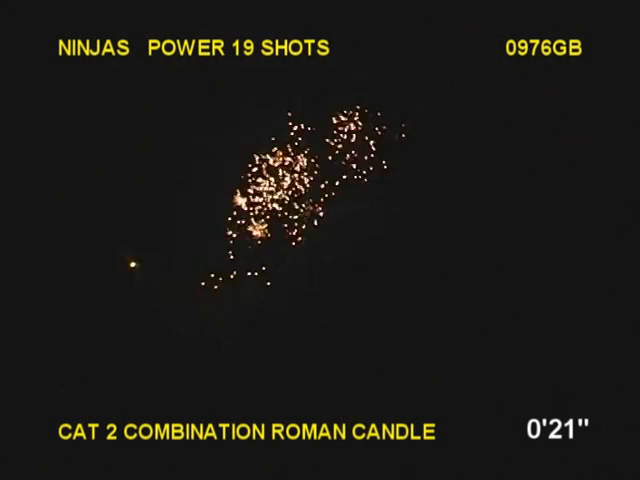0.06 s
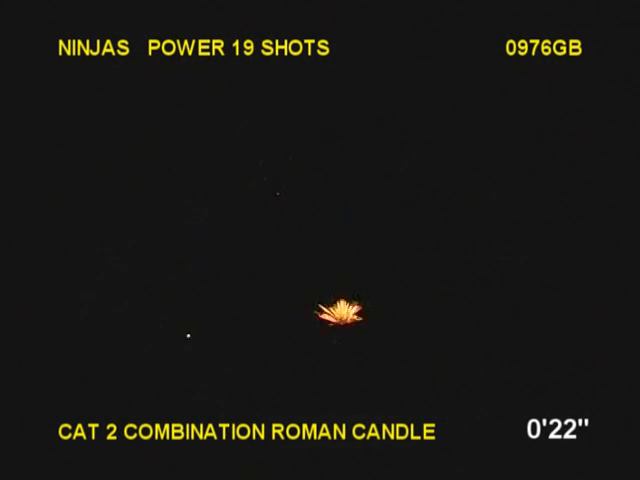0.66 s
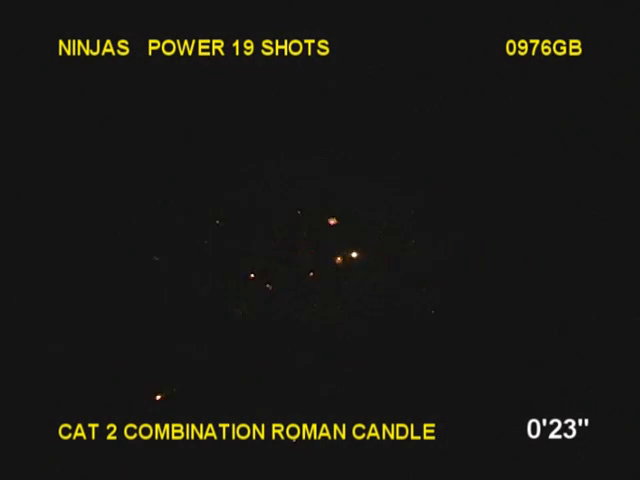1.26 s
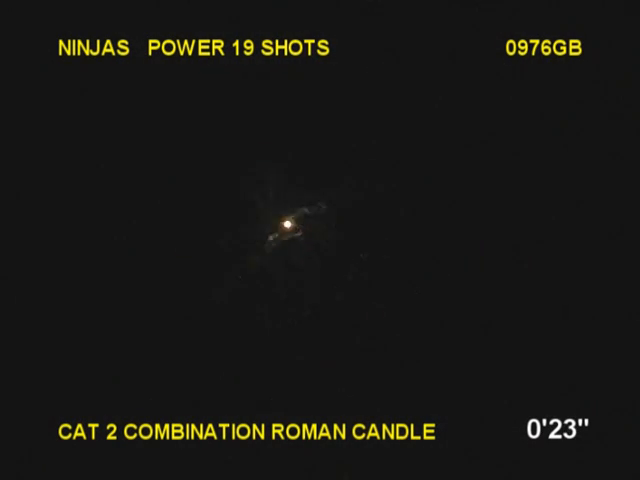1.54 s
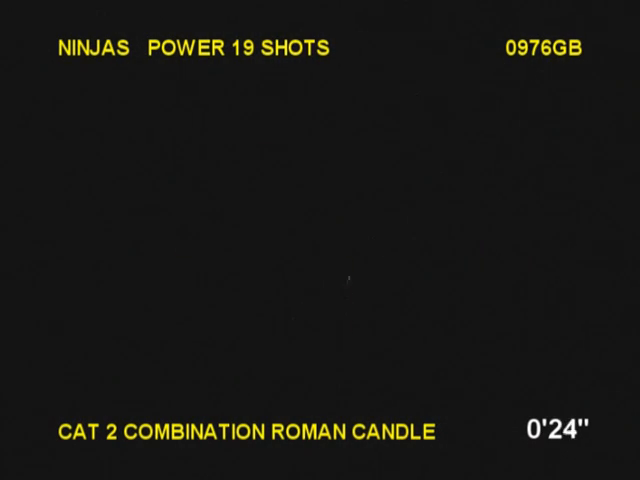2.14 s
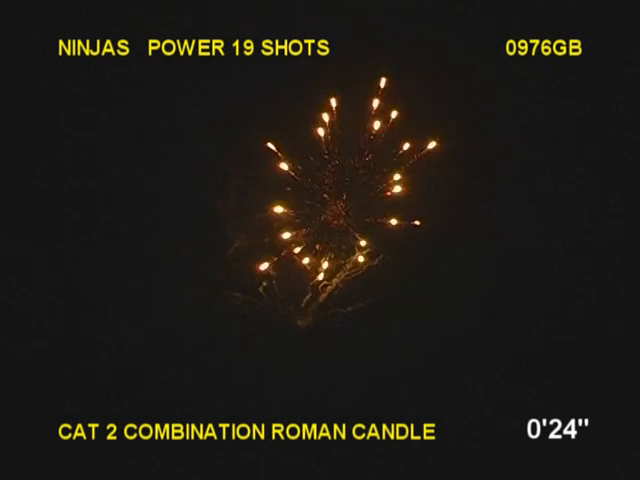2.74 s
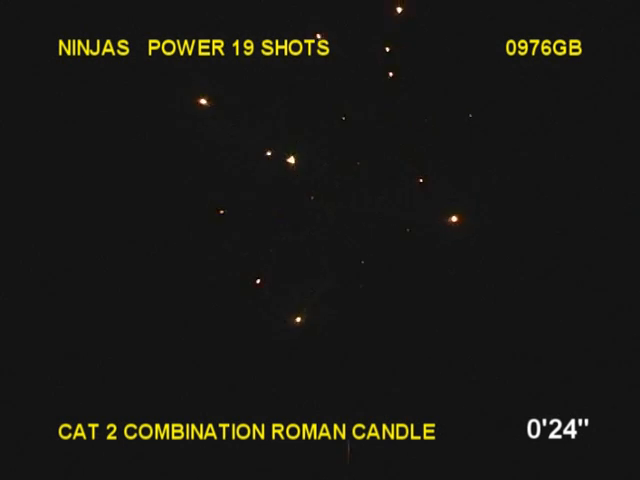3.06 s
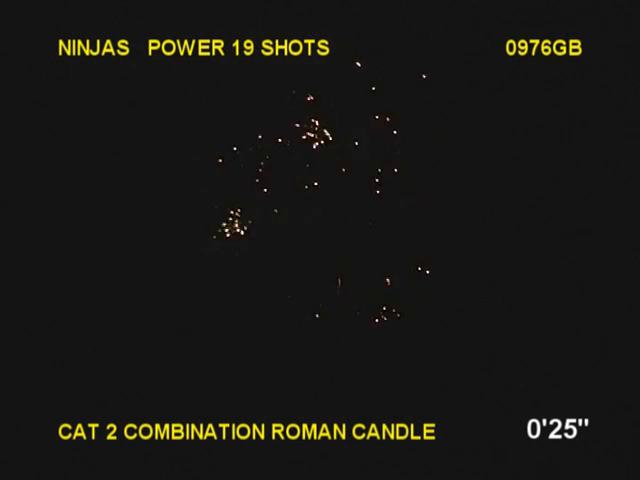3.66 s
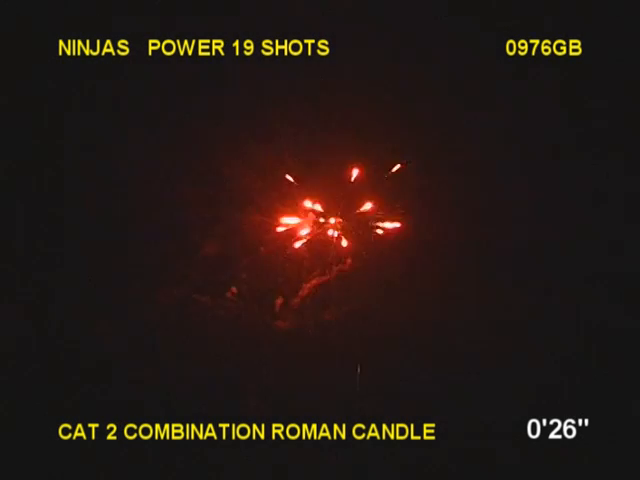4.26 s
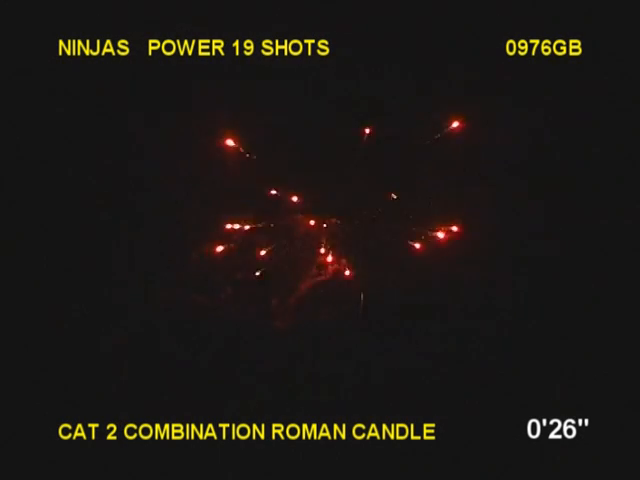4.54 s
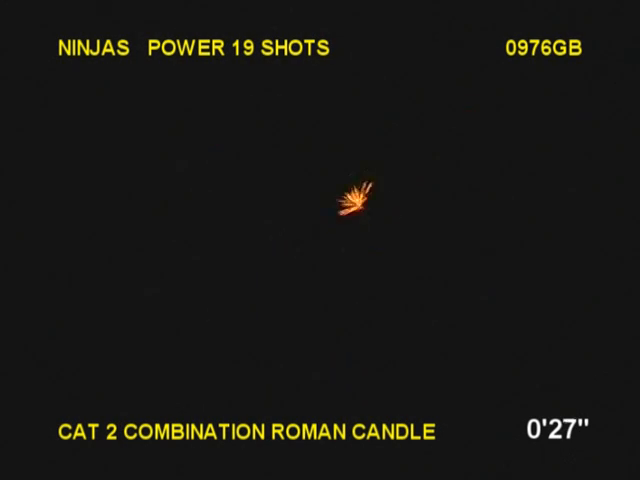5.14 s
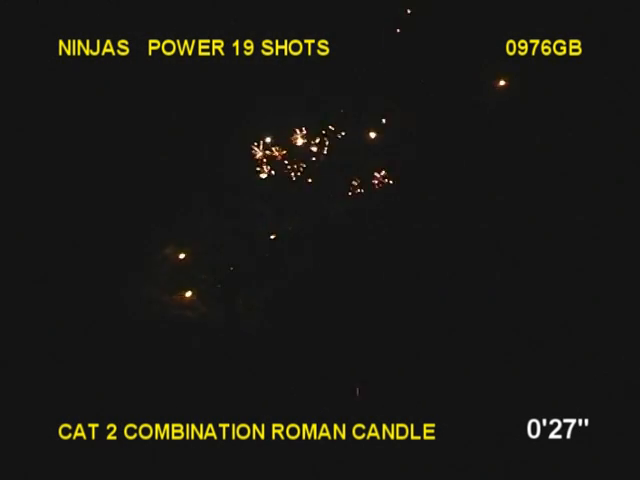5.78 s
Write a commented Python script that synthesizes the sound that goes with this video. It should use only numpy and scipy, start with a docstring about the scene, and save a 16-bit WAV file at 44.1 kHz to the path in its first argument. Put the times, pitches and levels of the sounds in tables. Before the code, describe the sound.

An outdoor firework barrage repeats low launch thumps, sharp echoing shell bursts and short clouds of crackle.

```python
"""A roman candle barrage outdoors at night, opening on the roll of shots just fired and a cloud of crackle.
Shells burst overhead at 1.0, 2.8 and 4.4 s; about 0.75 s after each, its stars crackle in tiny shocks.
In between, lift charges thump from the tubes. Debris taps down near 4.2 s; a last shell bursts at 5.5 s.
Each shot reaches the near microphone (left) some 85 ms before the far one (right). Buildings and trees
answer with echoes and a long roll; the bursts overload the recorder and ring hollow in its hum filter."""
import sys
import numpy as np
from scipy import signal
from scipy.fft import rfft, irfft, next_fast_len
from scipy.io import wavfile

SR = 44100
rng = np.random.default_rng(int(sys.argv[2]) if len(sys.argv) > 2 else 0)


def log_audio(samples):
    """Write samples as a 16-bit WAV file to the path given in sys.argv[1]."""
    # one column per channel
    frames = np.atleast_2d(samples).T
    # limit to full scale, then quantise
    limited = np.clip(frames, -1, 1)
    pcm = np.round(limited * 32767).astype(np.int16)
    wavfile.write(sys.argv[1], SR, pcm)


N = 265041
LEAD = SR  # samples before t = 0, for shots still rolling at the start
NEAR, FAR = 0, 1


# burst spectrum: f/Hz, level/dB
BURST_SPECTRUM = [(30, -45.5), (70, -15), (140, -4), (220, 2.5), (320, 3.5), (480, 3), (800, 1.5),
                  (1200, -3.5), (1800, -7), (3200, -12.5), (6400, -15.5), (11000, -25.5), (13500, -28.5),
                  (16000, -67)]
# shells: t/s, level/dB, lag to far mic/s, near ground bounce/s, far ground bounce/s
BURSTS = [(-.5, 6.5, 0.081, .00045, .0025), (0.9567, 6.5, .084, 0.00038, 0.00216),
          (2.8333, 7, 0.082, .00045, 0.00278), (4.4415, 6.5, .0819, .00046, .00275),
          (5.46, 6.5, 0.081, 0.00047, 0.0028)]

def bursts(near_db=4.5, far_db=11.5):
    """Each shell bursts with one shock wave; the near microphone stands low, the far one high."""
    out, pulse = np.zeros((2, LEAD + N)), shock(BURST_SPECTRUM)
    for t, db, lag_s, near_bounce_s, far_bounce_s in BURSTS:
        response = echoes(NEAR, roll_db=-3.5, wall_db=-7.5, air_db=3, grass_db=3.5, smear_db=2.5)
        near = with_echoes(bounced(pulse, near_bounce_s, share=0.67), pulse, response)
        response = echoes(FAR, roll_db=-8.5, wall_db=-13.5, air_db=2.5, grass_db=-0.5,
                          smear_s=0.0074, smear_db=3, lump_db=2.5)
        far = with_echoes(bounced(pulse, far_bounce_s, share=0.71), pulse, response)
        add(out[NEAR], t, amp(db + near_db) * lowpass(near, hz=11200, order=2))
        add(out[FAR], t + lag_s, amp(db + far_db) * far)
    return out


# lift charge spectrum: f/Hz, level/dB
LAUNCH_SPECTRUM = [(30, -53), (70, -4), (140, 1), (205, 3.5), (290, -3), (400, -4.5), (800, -23.5),
                   (1600, -23), (5000, -28.5), (11000, -42), (15000, -66)]
# lift charges: t/s, level/dB
LAUNCHES = [(-.38, -17.5), (1.5167, -17), (2.8989, -17.5), (3.9184, -16.5), (5.367, -21)]

def launches(lag_s=0.0887, near_db=3.5, far_db=8):
    """Lift charges thump from tubes at ground level; grass dulls the path to the low microphone."""
    out, pulse = np.zeros((2, LEAD + N)), shock(LAUNCH_SPECTRUM)
    for t, db in LAUNCHES:
        response = echoes(NEAR, roll_db=5.5, wall_db=4, air_db=-1.5)
        near = with_echoes(pulse, pulse, response)
        response = echoes(FAR, roll_db=-0.5, wall_db=7.5, air_db=-1, smear_db=-7,
                          sooner_s=0.00221, ground_db_per_s=50)
        far = with_echoes(pulse, pulse, response)
        add(out[NEAR], t, amp(db + near_db) * lowpass(near, hz=1920))
        add(out[FAR], t + lag_s, amp(db + far_db) * far)
    return out


# star pop spectrum: f/Hz, level/dB
STAR_SPECTRUM = [(60, -17.5), (250, 1.5), (700, 0.5), (1800, 1.4), (2700, -4.5), (3400, 0.5), (4200, -3),
                 (6000, -3.5), (9000, -14), (11500, -25.5), (13500, -29), (16000, -42)]
# star clouds: densest t/s, build-up/s, thinning/s, level/dB
STAR_CLOUDS = [(.265, 0.078, 0.14, -25), (1.69, .11, 0.14, -22), (3.59, .11, .22, -23.5),
               (5.168, .12, .11, -16.5)]
# single stars in and around the clouds: t/s, level/dB
LONE_STARS = [(0.0941, -27), (0.1394, -23), (0.163, -28), (0.1656, -15.5), (0.1763, -15), (0.1974, -19),
              (0.2237, -24), (0.2292, -18), (0.2374, -20), (0.2461, -15.5), (0.2547, -19), (0.2619, -13),
              (0.2689, -17), (0.2727, -13.5), (0.2839, -24), (0.289, -16.5), (0.2937, -20), (0.3015, -20),
              (0.311, -23), (0.3301, -16.5), (0.3405, -19), (0.347, -30), (0.3707, -19), (0.3745, -21),
              (0.378, -22.5), (0.3984, -16), (0.425, -19), (0.4449, -18.5), (0.7314, -24), (1.4661, -25),
              (1.4802, -18.5), (1.5124, -14), (1.5396, -16), (1.5613, -12), (1.5671, -20), (1.5852, -13.5),
              (1.6314, -12.5), (1.6498, -14), (1.656, -8), (1.6642, -10.5), (1.6719, -12), (1.6763, -9),
              (1.6865, -18), (1.7009, -19), (1.7045, -6.5), (1.7125, -10), (1.7381, -7), (1.759, -9),
              (1.789, -15), (1.7921, -24), (1.7952, -8.5), (1.8021, -21), (1.8194, -15), (1.8275, -12),
              (1.8368, -23), (1.9067, -12.5), (3.4102, -24.5), (3.4537, -21.5), (3.4824, -17),
              (3.5524, -13), (3.5635, -27), (3.5841, -26), (3.5963, -20), (3.6007, -14), (3.6095, -28),
              (3.6144, -13.5), (3.6557, -13.5), (3.6895, -15.5), (3.7115, -34), (3.72, -18), (3.773, -21),
              (3.778, -17), (3.7841, -31), (3.8247, -21), (3.8486, -24.5), (3.958, -15.5), (4.034, -19),
              (4.9644, -17.5), (4.976, -19), (5.0056, -15.5), (5.0239, -20), (5.0303, -15.5), (5.0509, -16),
              (5.0693, -16), (5.0945, -12.5), (5.097, -7.5), (5.1362, -6), (5.1471, -24), (5.1709, -23),
              (5.1761, -12.2), (5.1944, -11.5), (5.1997, -14.5), (5.2049, -24), (5.2147, -9.5),
              (5.2229, -14), (5.2434, -18), (5.2623, -20), (5.2856, -13), (5.289, -21), (5.3286, -13.5),
              (5.9923, -26)]

def crackle(far_db=0.5, scatter_db=-30, scatter_s=0.0077, lag_s=0.0825, lag_spread_s=0.0005):
    """Every star pops with a tiny shock of its own length, scattered by grass and nearby things."""
    pulse = shock(STAR_SPECTRUM, size=1024)
    cloud, near, far = np.zeros((3, LEAD + N))
    stars = np.vstack([cloud_stars(*row) for row in STAR_CLOUDS] + [LONE_STARS])
    n = np.arange(len(pulse))
    for t, db in stars:
        shortness, place, height, beam = rng.standard_normal(4)
        pop = amp(db) * np.interp(n * np.exp(0.11 * shortness), n, pulse)
        add(cloud, t, pop)
        scatter = amp(scatter_db) * rng.standard_normal(len(n)) * np.exp(-n / SR / scatter_s)
        pop = pop + np.convolve(pop, scatter)[:len(n)]
        # position in the sky sets the ground bounce and the lag between microphones
        steepness = np.exp(0.088 * height)
        add(near, t, bounced(pop, lag_s=0.000452 * steepness, share=0.61))
        far_pop = amp(2.4 * beam) * bounced(pop, lag_s=0.0029 * steepness, share=0.79)
        add(far, t + lag_spread_s * place, far_pop)
    near = with_echoes(near, cloud, echoes(NEAR, roll_db=-4.5, wall_db=-19, air_db=1, grass_db=1.5))
    far = with_echoes(far, cloud, echoes(FAR, roll_db=1.5, wall_db=-10, grass_db=-1.1))
    far = np.pad(far, (round(lag_s * SR), 0))
    return np.array([lowpass(near[:LEAD + N], hz=12000, order=6),
                     amp(far_db) * lowpass(far[:LEAD + N], hz=12200, order=6)])


def cloud_stars(middle_s, rise_s, fall_s, db, count=36, edge_db=1, spread_db=3):
    """Stars go off ever faster towards the cloud's middle, then thin out. Rows: t/s, level/dB."""
    burnt = 2 * (np.arange(count) + rng.random(count)) / count - 1
    edge = 1 - np.sqrt(1 - np.abs(burnt))
    times_s = middle_s + edge * np.where(burnt < 0, -rise_s, fall_s)
    levels_db = db + edge_db * edge + spread_db * rng.standard_normal(count)
    return np.column_stack([times_s, levels_db])


# tap spectrum: f/Hz, level/dB
TAP_SPECTRUM = [(100, -3), (400, 4.5), (1500, -1), (2700, -4), (3500, -2.5), (4300, -11), (7000, -15.5),
                (15000, -49)]
# debris landings: t/s, level/dB
TAPS = [(4.166, -27), (4.255, -24.5), (4.294, -28.5), (4.306, -28.5)]

def debris(decay_s=0.0011, near_db=-11):
    """Bits of casing tap down close to the far microphone; the surroundings scatter each tap."""
    track, age_s = np.zeros(LEAD + N), np.arange(SR // 20) / SR
    body = shock(TAP_SPECTRUM, size=1024)
    for t, db in TAPS:
        contact = rng.standard_normal(len(age_s)) * np.exp(-age_s / decay_s)
        tap = np.convolve(contact, body)
        add(track, t, amp(db) * tap / np.abs(tap).max())
    near, far = [with_echoes(track, track, echoes(mic, roll_db=7.5, wall_db=-5)) for mic in (NEAR, FAR)]
    return np.array([amp(near_db) * near, far])[:, :LEAD + N]


# scatter from trees and ground: delay t/s, near level/dB, far level/dB
ROLL = [(0, 12, 18), (0.014, -2.5, -3.5), (0.038, -8.5, -13.5), (.09, -17.5, 1), (.17, -2, -3.5),
        (.27, -8.5, -5.5), (.45, -13.5, -8.5), (1, -23.5, -20.5), (2, -35, -46.5)]
# building echoes, one list per mic: delay t/s, level/dB, cut-off f/Hz
WALLS = [
    [(.113, -28, 1200), (.160, -15, 1000), (.181, -11.5, 800), (.25, -33, 700), (.31, -15, 600),
     (.391, -17, 500)],
    [(.029, -25, 8000), (.051, -18.5, 2990), (.056, -17, 8200), (.070, -22.5, 2000), (.088, -7, 2000),
     (.121, -10.5, 1960), (.158, -10, 790), (.212, -14.5, 990), (.221, -9.5, 800)],
]

def echoes(mic, roll_db, wall_db, air_db=2, grass_db=0, grass_s=0.13, smear_s=0.0058, smear_db=-2,
           lump_db=1, sooner_s=0, ground_db_per_s=0):
    """Impulse response at one microphone: a roll, uneven from clumps of trees, and slaps off facades."""
    size, count = 256, 690
    age_s = np.arange(count)[:, None] * size / 2 / SR
    khz = np.fft.rfftfreq(size, 1000 / SR)
    delays_s, *levels_db = np.transpose(ROLL)
    level_db = np.interp(age_s, delays_s, levels_db[mic]) + roll_db
    level_db += lump_db * rng.standard_normal(age_s.shape)
    # air_db: per kHz and second of travel; grass_db: per kHz, on the earliest scatter
    loss_db = khz * (air_db * age_s + grass_db * np.exp(-age_s / grass_s))
    spectra = rfft(rng.standard_normal((count, size))) * amp(level_db - loss_db)
    frames = irfft(spectra) * np.sin(np.pi * np.arange(size) / size)
    response = (frames[:-1, size // 2:] + frames[1:, :size // 2]).ravel() / np.sqrt(SR)
    t = np.arange(SR // 20) / SR
    for delay_s, db, hz in WALLS[mic]:
        slap = rng.standard_normal(len(t)) * np.exp(-t / smear_s)  # smear from eaves and corners
        slap *= amp(smear_db) / np.linalg.norm(slap)
        slap[0] += 1
        gain = amp(db + wall_db - ground_db_per_s * delay_s) / np.sqrt(2)
        start = round((delay_s - sooner_s) * SR)
        response[start:start + len(t)] += gain * lowpass(slap, hz)
    return response


# night air spectrum: f/Hz, level/dB
NIGHT_SPECTRUM = [(20, -1), (50, 6), (130, -1.5), (200, -0.5), (320, -18), (800, -18.5), (2000, -28),
                  (3300, -39), (4200, -39), (6000, -46), (11500, -33), (13500, -46)]

def night(near_db=-58, far_db=-50):
    """A faint distant rumble, unrelated at the two microphones."""
    size = next_fast_len(N + 8192)
    noise = rng.standard_normal((2, size))
    air = irfft(rfft(noise) * bin_gains(NIGHT_SPECTRUM, size), size)[:, :N]
    return air / air.std() * amp([[near_db], [far_db]])


def shock(spectrum, size=4096):
    """Pressure pulse of peak 1: steep front, suction, short ring."""
    pulse = minimum_phase(spectrum, size)
    return pulse / np.abs(pulse).max()


def bounced(pulse, lag_s, share):
    """A pulse from overhead plus its ground reflection."""
    t = np.arange(len(pulse)) / SR
    return pulse + share * np.interp(t - lag_s, t, pulse, left=0)


def with_echoes(direct, pulse, response):
    """Direct sound plus the pulse's echoes."""
    sound = signal.oaconvolve(pulse, response)
    sound[:len(direct)] += direct
    return sound


def minimum_phase(spectrum, size=4096):
    """Shortest causal response with the given spectrum."""
    cepstrum = irfft(np.log(bin_gains(spectrum, size)))
    cepstrum[1:size // 2] *= 2
    cepstrum[size // 2 + 1:] = 0
    return irfft(np.exp(rfft(cepstrum)))[:size // 2]


def bin_gains(spectrum, size):
    """Rows of f/Hz, level/dB as gains on an FFT grid."""
    hz, db = np.transpose(spectrum)
    bins_hz = np.fft.rfftfreq(size, 1 / SR)
    return amp(np.interp(np.log(bins_hz + 1), np.log(hz), db))


def amp(db):
    """Decibels to gain."""
    return 10 ** (np.asarray(db) / 20)


def lowpass(x, hz, order=1):
    """Cut the treble above hz."""
    return signal.sosfilt(signal.butter(order, hz, fs=SR, output="sos"), x)


def add(track, start_s, sound):
    """Mix a sound into a track that has a lead-in."""
    start = max(LEAD + round(start_s * SR), 0)
    part = track[start:start + len(sound)]
    part += sound[:len(part)]


# microphone responses, near then far: f/Hz, level/dB
MIC_RESPONSES = [
    [(400, -1), (1100, -1), (1500, -1), (1900, 0.5), (3100, -4.5), (4500, 0), (5200, 3.5), (6500, -2.5),
     (9500, 4), (12000, -5.5), (14500, -3)],
    [(60, -1.5), (180, 1.5), (260, 1.5), (400, -1), (490, 2), (640, 2), (740, 2), (1000, 2.5), (1300, 0.5),
     (2500, 0.9), (3500, 1.5), (4150, -5.5), (5200, 1), (7500, 1), (12000, 0), (14500, -6)],
]

def scene():
    """The barrage over the quiet of the night, as each microphone colours it."""
    pressure = (bursts() + launches() + crackle() + debris())[:, LEAD:] + night()
    mics = np.array([minimum_phase(mic) for mic in MIC_RESPONSES])
    return signal.oaconvolve(pressure, mics, axes=1)[:, :N]


# notch combs: spacing f/Hz, width/Hz, depth/0-1
HUM_COMBS = [(300, 22, .66), (600, 30, .55)]
# single low notch: f/Hz, width/Hz, depth/0-1
HUM_NOTCH = (143, 23, 0.68)

def hum_filter(x):
    """Combs of narrow notches, plus one low notch, make the bangs ring hollow."""
    size = next_fast_len(N + 8192)
    hz, spectrum = np.fft.rfftfreq(size, 1 / SR), rfft(x, size)
    for spacing_hz, width_hz, depth in HUM_COMBS:
        delay = np.exp(-2j * np.pi * hz / spacing_hz)
        feedback = np.exp(-np.pi * width_hz / spacing_hz)
        comb = (1 + feedback) / 2 * (1 - delay) / (1 - feedback * delay)
        spectrum *= 1 - depth + depth * comb
    centre_hz, width_hz, depth = HUM_NOTCH
    band = 1j * hz * width_hz / (centre_hz ** 2 - hz ** 2 + 1j * hz * width_hz)
    return irfft(spectrum * (1 - depth * band), size)[:, :N]


def record(dry, ceiling=0.62, hardness=5, flip_above=6.13, flip_depth=1.5):
    """The input stage flattens the shocks and briefly flips over at their tips; a hum filter follows."""
    clipped = dry / (1 + np.abs(dry / ceiling) ** hardness) ** (1 / hardness)
    flipped = clipped - flip_depth * ceiling * np.clip(2 * (dry - flip_above), 0, 1)
    coupled = signal.sosfilt(signal.butter(1, 50, "high", fs=SR, output="sos"), flipped)
    softened = lowpass(hum_filter(coupled), hz=12000, order=3)
    return lowpass(softened, hz=15500, order=20)


dry = scene()
out = record(dry)
log_audio(out)
```